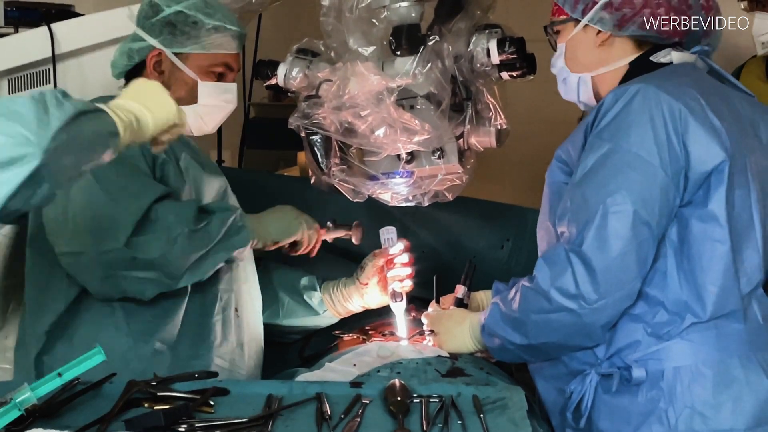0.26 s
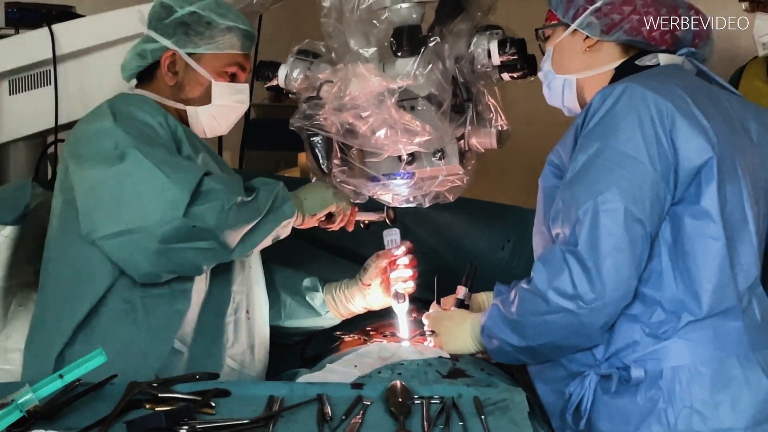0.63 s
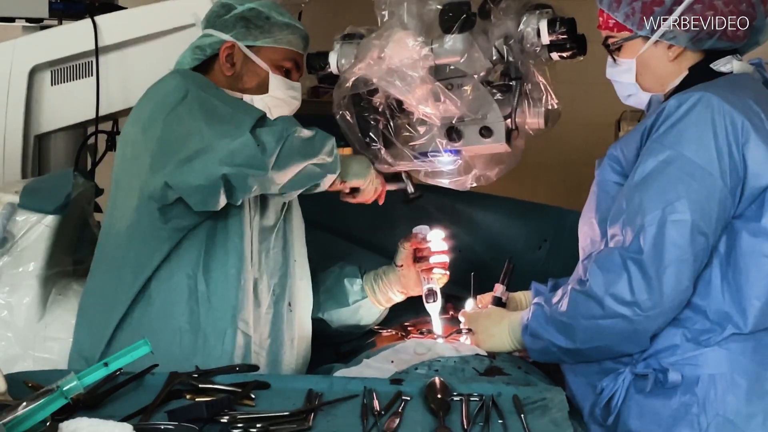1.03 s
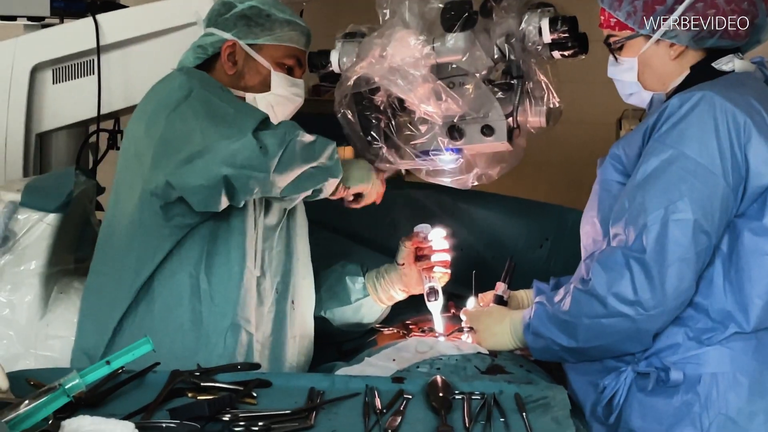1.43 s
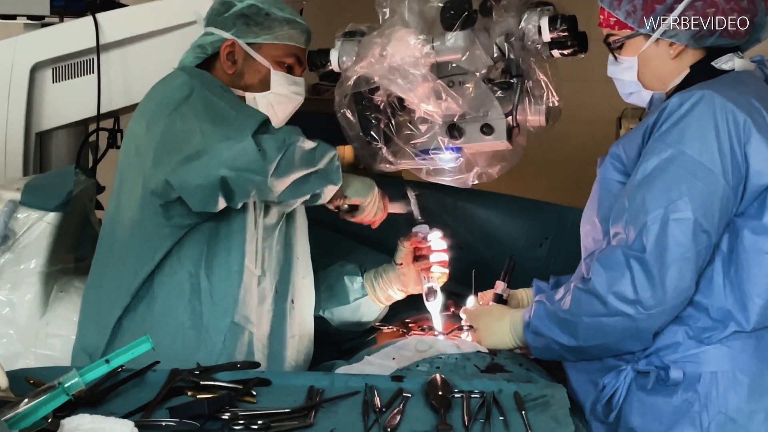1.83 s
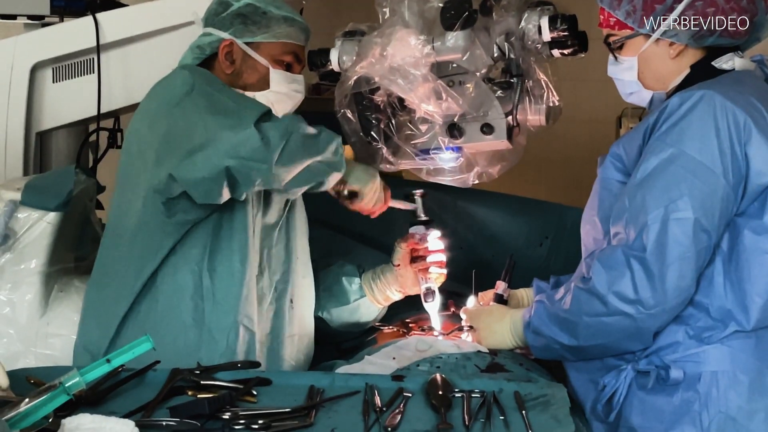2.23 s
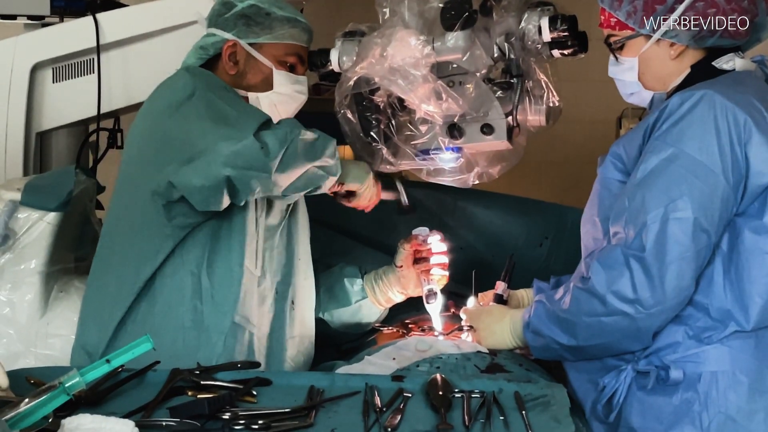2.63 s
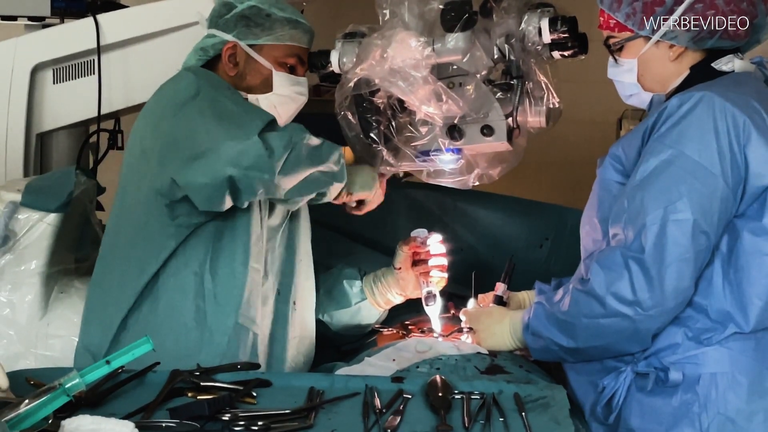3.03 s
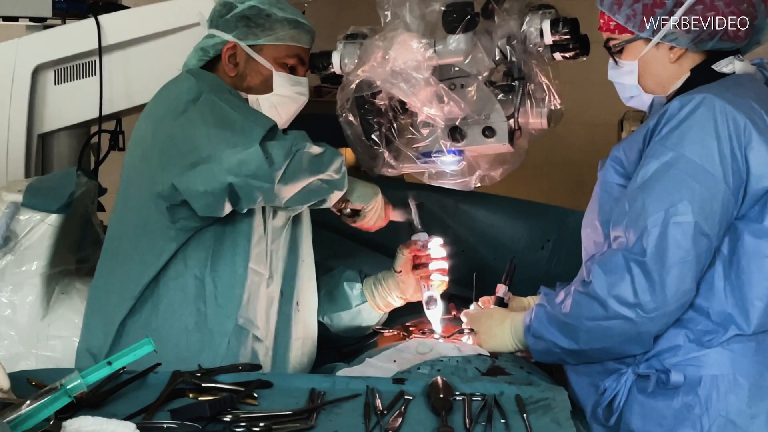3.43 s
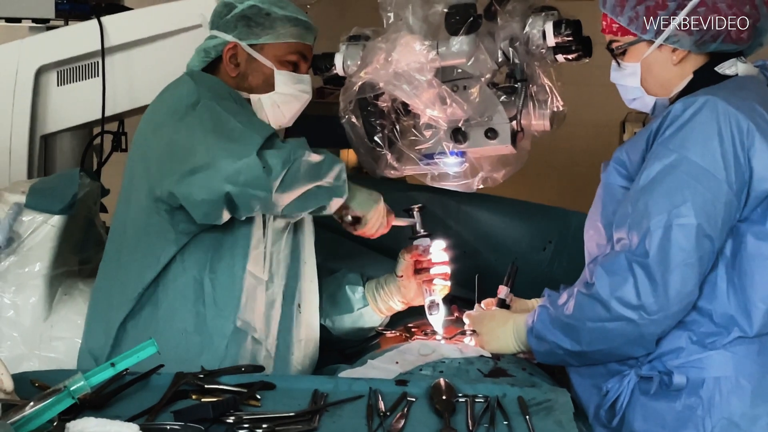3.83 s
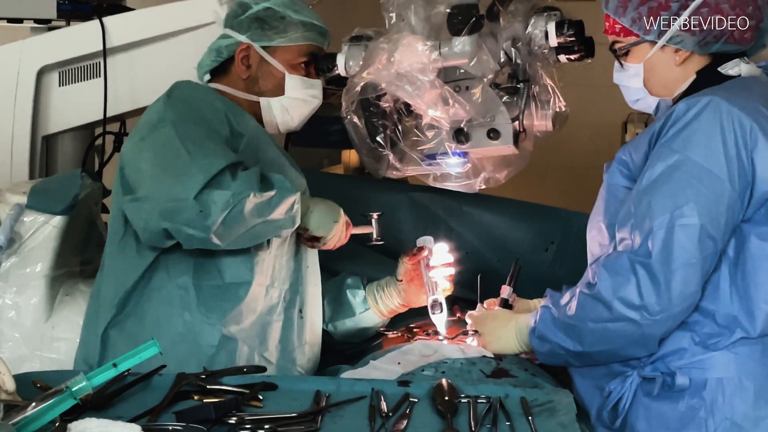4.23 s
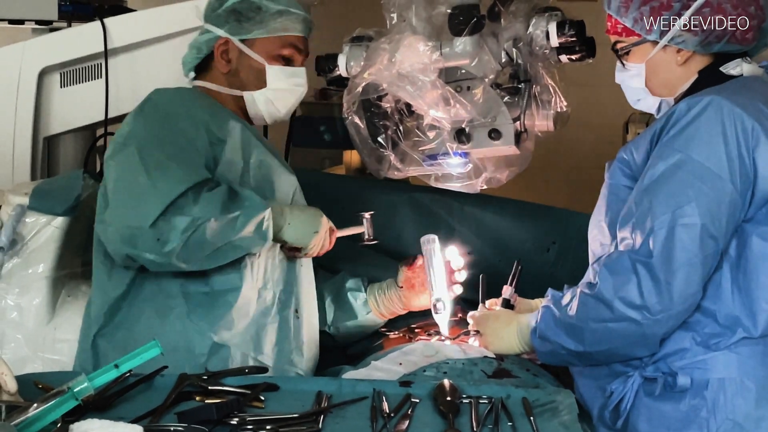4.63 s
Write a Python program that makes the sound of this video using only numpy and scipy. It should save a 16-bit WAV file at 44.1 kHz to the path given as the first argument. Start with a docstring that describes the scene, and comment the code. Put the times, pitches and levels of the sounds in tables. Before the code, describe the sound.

A steel mallet drives an instrument into bone with sixteen quick, fairly even metallic taps, echoing in a hard-walled operating room over low ventilation rumble.

```python
"""First come rumbling ventilation, a rustling gown and one tool's click; then sixteen quick, fairly even taps.
A surgeon drives a steel instrument into bone with a mallet. Each tap is a burst of filtered noise for the
hard crack, plus fading sine waves for the ringing shaft, handle and mallet head and the dull knock of bone.
A tiled operating room answers with echoes and a noise tail. The air and the gown are filtered noise."""
import sys
import numpy as np
from scipy import signal
from scipy.fft import rfft, irfft
from scipy.io import wavfile

SR = 44100
rng = np.random.default_rng(int(sys.argv[2]) if len(sys.argv) > 2 else 0)


def wav_record(signal):
    """Record a signal, one row per channel, as 16-bit PCM in the file named by sys.argv[1]."""
    frames = np.transpose(np.atleast_2d(signal))
    bounded = np.clip(frames, -1, 1)
    # unit amplitude maps onto the largest positive 16-bit level
    quanta = np.round(bounded * 32767).astype(np.int16)
    wavfile.write(sys.argv[1], SR, quanta)


N = 214673  # length of the scene [samples]

# Mallet taps: (time [s], strength [dB], contact rise [s], pitch of the shaft's lowest clank [Hz],
# relative clank level [dB], relative handle level [dB])
TAPS = [(1.129, 0.5, 0.00037, 1850, 0, 2), (1.311, -.5, 0.00024, 1820, 0, 9.5),
        (1.4966, -2.5, 0.00012, 1290, 0, 10.5), (1.679, -1.5, 0.00047, 1350, 0, 10.5),
        (1.857, 1.5, 0.00038, 1370, -2, 4.5), (2.0383, 0.5, 0.00029, 1400, 1.5, -1),
        (2.2156, -1.5, 0.00015, 1600, 0, 1.5), (2.4022, -0.5, 0.00026, 1360, -1, 6),
        (2.5825, -0.5, 0.000094, 1350, -2, 4.5), (2.754, -0.5, 0.000069, 1450, 0, 3),
        (2.9283, -.5, 0.00009, 1370, -2, 6), (3.1032, -1.5, 0.00038, 2000, -4, 6),
        (3.2784, 1.5, 0.00075, 1770, 1.5, -14), (3.458, 1, .001, 1750, 2.5, 1),
        (3.648, 1.5, .0011, 1720, 2, -13.5), (3.8492, 1.5, 0.00049, 1640, 0, -3)]
# A glancing blow sends less sound straight ahead: level for an instant contact, loss per second of rise
SQUARE_DB, GLANCE_DB_PER_S = 4, 4797.5
# Until the loose tip bites, the mallet head hardly rings and more sound comes straight ahead
LOOSE_MALLET_DB, LOOSE_DIRECT_DB, BITE_DEPTH = -17, 4.5, 0.025


def mallet_taps(count):
    """Every tap drives the tip an equal step deeper, from depth 0 to 1, which changes how the parts ring."""
    sent, near = np.zeros((count, N)), np.zeros(N)
    depths = np.linspace(0, 1, len(TAPS))
    for (s, db, rise_s, clank_hz, clank_db, handle_db), depth in zip(TAPS, depths):
        loose = np.exp(-depth / BITE_DEPTH)
        mallet_db = LOOSE_MALLET_DB * loose
        rays = undb(db) * tap(rise_s, handle_db, mallet_db, clank_hz, clank_db, depth, count)
        direct_db = SQUARE_DB - GLANCE_DB_PER_S * rise_s + LOOSE_DIRECT_DB * loose
        add(sent, s, rays)
        add(near, s, early(rays, direct_db))
    return sent, near


# Ringing modes of each part: (pitch [Hz], relative energy [dB], time to fade by 60 dB [s])
SHAFT_MODES = [(786, -55.5, 0.025), (880, -53, 0.045), (956, -51, 0.044), (1013.6, -53.5, 0.61),
               (1063, -56, .05), (1802, -60, 0.11), (2540, -63.5, 0.013), (6310, -54.5, .03),
               (6530, -59.5, .03), (7330, -51.5, 0.024)]
HANDLE_MODES = [(8530, -49, 0.0064), (8940, -55.5, .032), (9020, -52, 0.02), (9280, -49, .02)]
MALLET_MODES = [(11700, -48, 0.0077), (11970, -49.5, 0.0444), (12270, -41, 0.02), (14145, -67, 0.17)]
BONE_MODES = [(159, -57, 0.093), (243, -60, 0.029), (360, -63, 0.046), (497, -60.5, 0.071)]
# Once the bone grips, it damps the ring of the body (shaft and bone)
BODY_DB, GRIP_DAMP_DB, GRIP_DEPTH, GRIP_SPREAD = 3.5, 6.5, 0.69, 0.07


def tap(rise_s, handle_db, mallet_db, clank_hz, clank_db, depth, count):
    """One tap, a row per direction: the crack of the contact, then the ring of each struck part."""
    t = np.arange(SR // 4) / SR
    rise_s = max(rise_s, 1 / SR)
    # a square blow peaks at once; a glancing one grinds in
    seat = 1 - np.exp(-t / rise_s)
    grip = 1 / (1 + np.exp((GRIP_DEPTH - depth) / GRIP_SPREAD))
    shaft = ring(SHAFT_MODES, t, count, detune=0.005)
    bone = ring(BONE_MODES, t, count, detune=0.013)
    body = undb(BODY_DB - GRIP_DAMP_DB * grip) * (shaft + bone)
    handle = undb(handle_db) * ring(HANDLE_MODES, t, count, detune=0.00392)
    mallet = undb(mallet_db) * ring(MALLET_MODES, t, count, scatter_db=3.0, detune=0.0023)
    clanks = undb(clank_db) * shaft_clanks(clank_hz, depth, t, count)
    return steel_crack(rise_s, seat, depth, t, count) + seat * (clanks + body + handle + mallet)


# Spectrum of steel on steel: (frequency [Hz], relative level per Hz [dB])
CRACK_SPECTRUM = [(60, -12), (200, -12.5), (400, -10), (620, -14.5), (900, 0), (1250, -6.5), (2000, -8.5),
                  (2800, -5), (4000, -2), (5000, 0.5), (7300, 4), (10200, -2), (12400, -0.5), (13200, -8.5)]
CRACK_DB, CRACK_T60_S = -36.5, 0.0086  # relative energy; shortest fade, before the contact rise adds to it
# The taps grow brighter from first to last: top treble at depth 0, and its gain up to depth 1
TREBLE_DB, TREBLE_GAIN_DB = -4, 9.5


def steel_crack(rise_s, seat, depth, t, count):
    """Dense, fast-dying steel modes, made as noise; later taps have more top treble."""
    top_db = TREBLE_DB + TREBLE_GAIN_DB * depth
    # the treble change comes in between 12400 and 13200 Hz
    spectrum = [(hz, db + top_db * np.clip((hz - 12400) / 800, 0, 1)) for hz, db in CRACK_SPECTRUM]
    # a glancing blow lasts a little longer
    contact = seat * fade(t, CRACK_T60_S + 4 * rise_s)
    bursts = [colour(rng.standard_normal(len(t)) * contact, spectrum) for _ in range(count)]
    return undb(CRACK_DB) * unit(np.array(bursts))


# The shaft's three clanks, low to high: (relative energy at depth 0 [dB], gain up to depth 1 [dB])
CLANK_LEVELS = [(-48.5, 2.5), (-48, -1), (-51.5, 3)]
# Middle and high clanks close in on each other as the tip seats: (loose pitch [Hz], seated pitch [Hz])
UPPER_CLANK_PITCHES = [(2240, 2594), (4300, 3300)]
SETTLE_DEPTH, CLANK_STRAY = 0.18, 0.033  # depth scale of that change; random pitch spread (fraction)
CLANK_T60_S = 0.0075


def shaft_clanks(lowest_hz, depth, t, count):
    """Bending modes of the shaft, which bone and fist damp within a few milliseconds."""
    unsettled = np.exp(-depth / SETTLE_DEPTH)
    upper_hz = [seated + (loose - seated) * unsettled for loose, seated in UPPER_CLANK_PITCHES]
    stray = 1 + CLANK_STRAY * rng.standard_normal(2)
    pitches = [lowest_hz, *(upper_hz * stray)]
    modes = [(hz, db + gain_db * depth, CLANK_T60_S) for hz, (db, gain_db) in zip(pitches, CLANK_LEVELS)]
    return ring(modes, t, count, scatter_db=1.0, detune=0.004)


def ring(modes, t, count, scatter_db=0.5, detune=0.0033):
    """Struck modes as fading sines sent in several directions; pitches shift a little at each strike."""
    hz, db, t60 = np.transpose(modes)
    hz = hz * (1 + detune * rng.standard_normal(len(hz)))
    waves = unit(np.sin(2 * np.pi * hz[:, None] * t) * fade(t, t60[:, None]))
    # each direction gets its own mix of levels and signs
    size, side = rng.standard_normal((2, count, len(hz)))
    return (np.sign(side) * undb(db + scatter_db * size)) @ waves


# Modes of the clicking tool: (pitch [Hz], relative energy [dB], time to fade by 60 dB [s])
TOOL_MODES = [(1455, -8.5, .018), (1780, -3, 0.017), (1920, -6, 0.029), (2065, -4, 0.033),
              (2830, -14.5, 0.043), (4050, -17, 0.0036), (5900, -19, 0.0032)]
CLICK_S, CLICK_DB, CLICK_DIRECT_DB = 0.4185, -62.5, 10.5  # time; relative level; level of its straight path


def tool_click(sent, near):
    """A tool clicks as it is taken up: a few short modes ring and die at once."""
    count = len(sent)
    click = undb(CLICK_DB) * ring(TOOL_MODES, np.arange(SR // 4) / SR, count)
    add(sent, CLICK_S, click)
    add(near, CLICK_S, early(click, CLICK_DIRECT_DB))


# Early echoes off the microscope, table and floor: (delay [s], relative level [dB])
NEAR_ECHOES = [(.0022, 0), (.0066, -12.5), (.0080, -6.5)]


def early(rays, direct_db):
    """The straight path, which hand and mallet shade, and echoes of the rays that meet nearby surfaces."""
    out = undb(direct_db) * rays[0]
    for (s, db), ray in zip(NEAR_ECHOES, rays[1:]):
        add(out, s, undb(db) * ray)
    return out


# The near sound is slightly duller at the very top: (frequency [Hz], relative level [dB])
NEAR_SPECTRUM = [(200, -1.5), (1000, -1), (2500, -1), (7000, -1.5), (14000, -2.5)]


def soften_near(near):
    """Filter the direct sound and early echoes, softening the top treble slightly."""
    return colour(near, NEAR_SPECTRUM)


# The room's tail: (frequency [Hz], time to fade by 60 dB [s], relative level [dB])
ROOM_BANDS = [(125, 0.69, 0.5), (489, 0.8, -2), (1102, 0.61, -2.5), (2500, 0.6, 2.5), (4950, 0.51, 0),
              (8180, 0.39, -3), (12000, 0.29, -0.5), (16000, 0.11, -12)]
BUILD_S = 0.0051  # time scale on which the tail builds up


def room(x):
    """Diffuse tail of hard walls: noise builds up in a few milliseconds, and the top treble dies first."""
    t = np.arange(SR) / SR
    hz, t60, db = np.transpose(ROOM_BANDS)
    noise = rfft(rng.standard_normal(len(t)))
    bins = np.fft.rfftfreq(len(t), 1 / SR)
    tail = 0
    # each row of the identity picks out one band, blending into its neighbours
    for share, decay, band_db in zip(np.eye(len(hz)), t60, db):
        shape = unit(fade(t, decay) * (1 - np.exp(-t / BUILD_S))) / np.sqrt(SR)
        band = irfft(noise * on_log(bins, hz, share), len(t))
        tail = tail + undb(band_db) * shape * band
    return signal.fftconvolve(x, tail)[:N]


# Spectrum of the gown's rustle: (frequency [Hz], relative level per Hz [dB])
GOWN_SPECTRUM = [(150, 2), (700, 0.5), (1300, -11), (2300, -10), (3300, -8.5), (4500, -18), (8000, -19),
                 (12000, -20), (16000, -32)]
# The gown rubs as the arm moves: (start [s], length before fading [s], level before the flicker [dB])
ARM_MOVES = [(0, 0.294, -58), (0.278, 0.46, -55.5), (.97, .04, -70), (4.622, .12, -65.5)]
RUSTLE_ATTACK_S, RUSTLE_T60_S = 0.018, 0.043


def gown():
    """Cloth rubs in small uneven strokes as the arm moves: each move swells, holds and dies away."""
    t = np.arange(N) / SR
    moves = 0
    for s, length, db in ARM_MOVES:
        swell = np.clip((t - s) / RUSTLE_ATTACK_S, 0, 1)
        release = fade(np.maximum(t - s - length, 0), RUSTLE_T60_S)
        moves = moves + undb(db) * swell * release
    strokes = undb(1.4 * walk(41))
    return hiss(GOWN_SPECTRUM) * moves * strokes


# Spectra of air noise and duct rumble: (frequency [Hz], relative level per Hz [dB])
AIR_SPECTRUM = [(100, -0.5), (230, -10.5), (400, 2), (600, -5), (750, -1.5), (1100, -10.5), (2000, -13.5),
                (3400, -18), (4000, -21.5), (8000, -24), (16000, -37.5)]
RUMBLE_SPECTRUM = [(25, -11), (42, -23.5), (57, -5), (76, -8.5), (115, 2.5), (145, -7.5), (190, -1.5),
                   (260, -15), (400, -33), (1000, -62)]
# Humming duct resonances: (pitch [Hz], width as rate of random change [Hz], relative level [dB])
DUCT_HUMS = [(99, 10, -57.5), (159.2, 27, -59), (760, 110, -71)]
RUMBLE_DB, AIR_DB = -51, -56.5  # relative levels
FLOW_DB, FLOW_DB_PER_S = 1.02, -0.5  # the ventilation eases off slowly


def ventilation():
    """Smooth air noise, an unsteady rumble, and duct resonances whose hum swells and fades."""
    t = np.arange(N) / SR
    hum = 0
    for hz, width, db in DUCT_HUMS:
        # two slow random signals make the hum's level and phase wander
        wander = walk(width) + 1j * walk(width)
        hum = hum + undb(db) * np.real(wander * np.exp(2j * np.pi * hz * t))
    rumble = hiss(RUMBLE_SPECTRUM) * undb(RUMBLE_DB + 0.67 * walk(12))
    air = hiss(AIR_SPECTRUM) * undb(AIR_DB)
    return (air + rumble + hum) * undb(FLOW_DB + FLOW_DB_PER_S * t)


def hiss(spectrum):
    """Coloured noise with an rms level of 1."""
    x = colour(rng.standard_normal(N), spectrum, size=8192)
    return x / np.std(x)


def walk(rate):
    """Random wandering: straight lines between random points, `rate` of them per second."""
    knots = rng.standard_normal(1024)
    return np.interp(np.arange(N) / SR * rate, np.arange(len(knots)), knots)


def colour(x, spectrum, size=2048):
    """Filter with the given (Hz, dB) spectrum, reacting as early as possible (minimum phase)."""
    bins = np.fft.rfftfreq(size, 1 / SR)
    gain = undb(on_log(bins, *np.transpose(spectrum)))
    # folding the cepstrum forward in time keeps the filter from sounding ahead of its input
    cepstrum = irfft(np.log(gain))
    cepstrum[1:size // 2] *= 2
    cepstrum[size // 2 + 1:] = 0
    return signal.fftconvolve(x, irfft(np.exp(rfft(cepstrum))))[:len(x)]


def on_log(hz, points, values):
    """Join points by straight lines on a log-frequency axis."""
    return np.interp(np.log(np.maximum(hz, 1)), np.log(points), values)


def fade(t, t60):
    """Exponential decay of 60 dB in t60 seconds."""
    return np.exp(-np.log(1000) * t / np.maximum(t60, 1e-4))


def unit(x):
    """Scale each row to the energy of a signal with rms 1 lasting one second."""
    return x / np.sqrt(np.sum(x ** 2, axis=-1, keepdims=True) / SR)


def undb(db):
    """Decibels to gain."""
    return 10 ** (np.asarray(db) / 20)


def add(track, s, sound):
    """Mix a sound in at time s, in seconds."""
    start = int(s * SR)
    track[..., start:start + sound.shape[-1]] += sound[..., :track.shape[-1] - start]


DIRECT_DB, ROOM_DB = -9.5, -3  # mix of the near sound and the room's tail


def scene(count=6):
    """Taps and the click, sent in `count` directions, heard directly and through the room, over the background."""
    sent, near = mallet_taps(count)
    tool_click(sent, near)
    # each direction finds its own way round the walls, so the tail is evenly filled
    walls = sum(room(ray) for ray in sent) / np.sqrt(count)
    struck = undb(DIRECT_DB) * soften_near(near) + undb(ROOM_DB) * walls
    return (struck + gown() + ventilation())[None]


LOW_CUT_HZ, TOP_HZ = 60, 15800


def record(dry):
    """The microphone drops the deepest bass and the recorder cuts the top."""
    low_cut = signal.butter(4, LOW_CUT_HZ, "high", fs=SR, output="sos")
    top_cut = signal.ellip(8, 0.2, 70, TOP_HZ, fs=SR, output="sos")  # 0.2 dB ripple, 70 dB rejection
    return signal.sosfilt(top_cut, signal.sosfilt(low_cut, dry))


dry = scene()
out = record(dry)
wav_record(out)
```